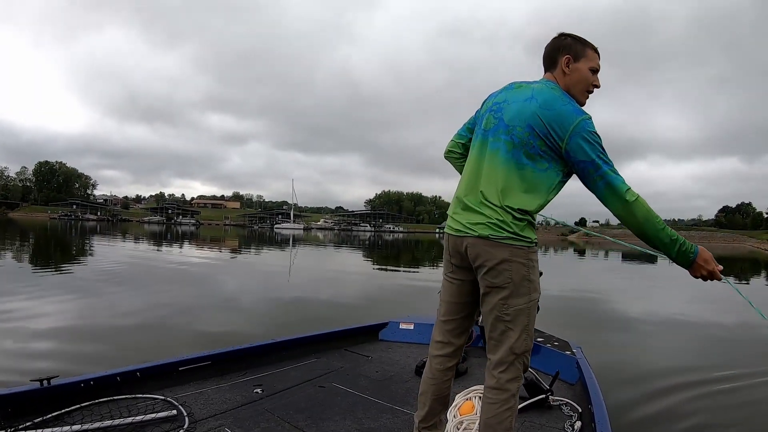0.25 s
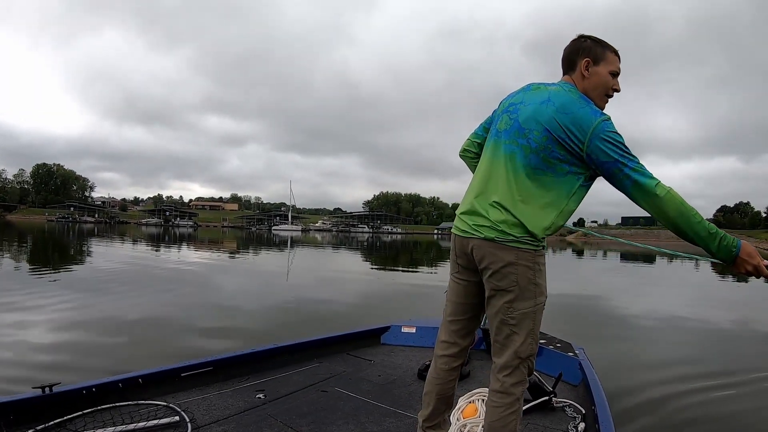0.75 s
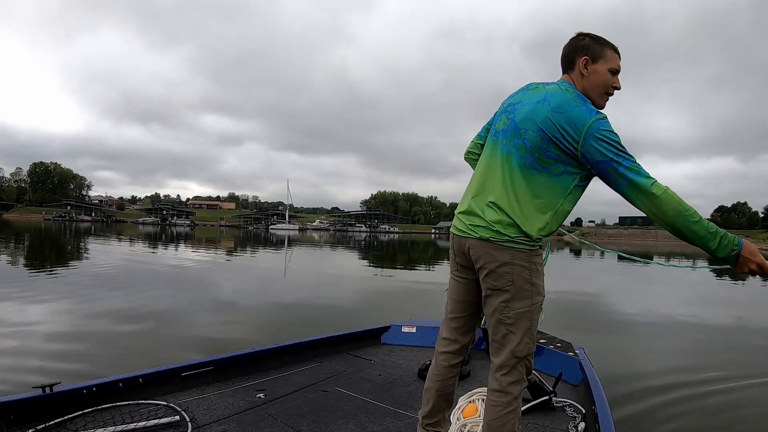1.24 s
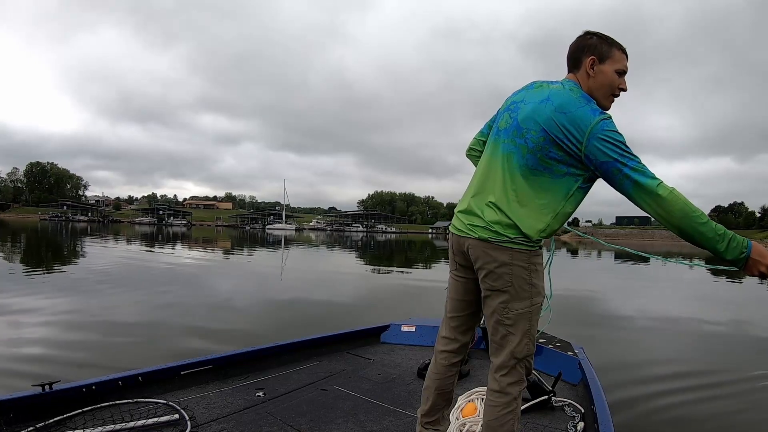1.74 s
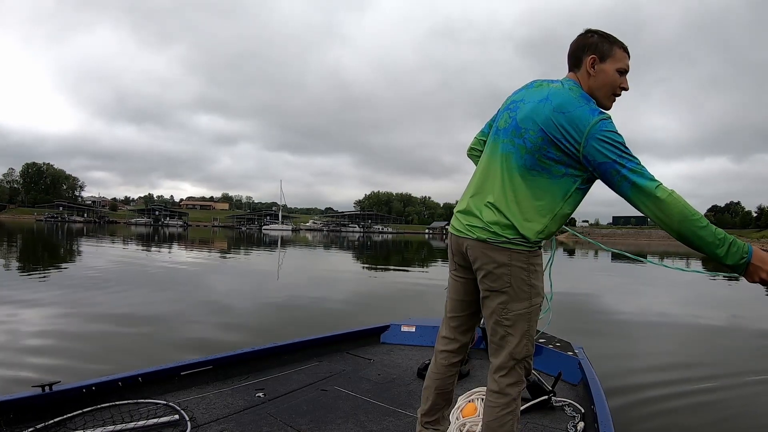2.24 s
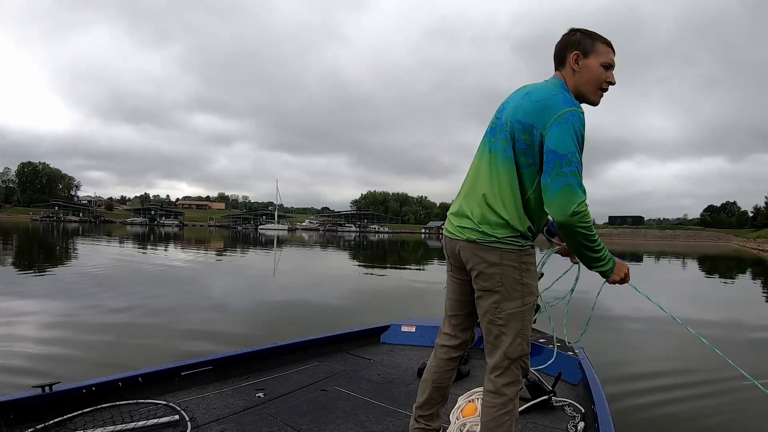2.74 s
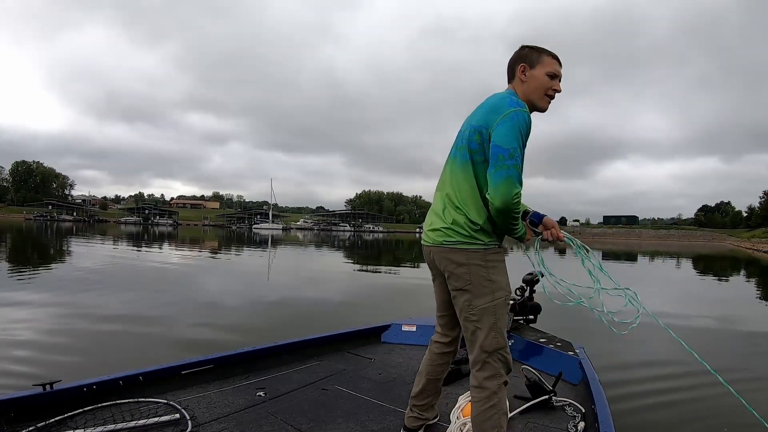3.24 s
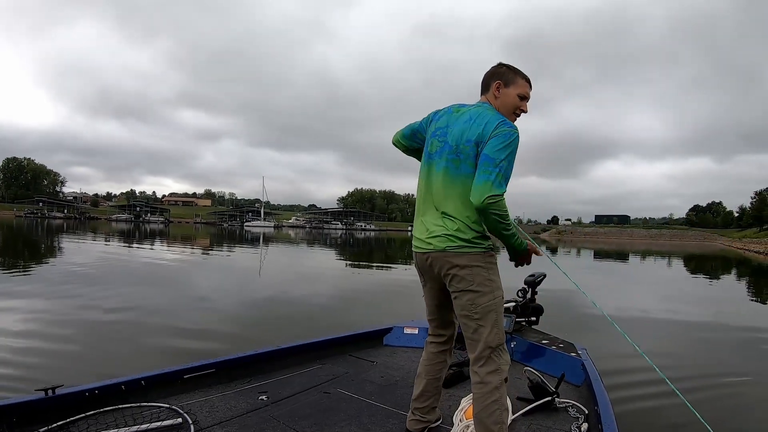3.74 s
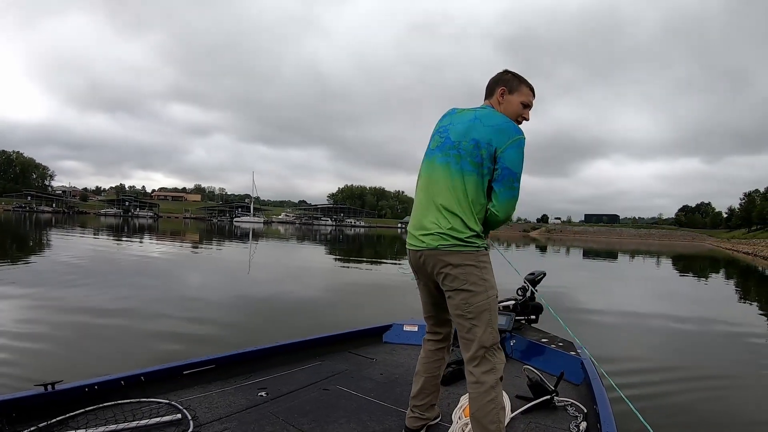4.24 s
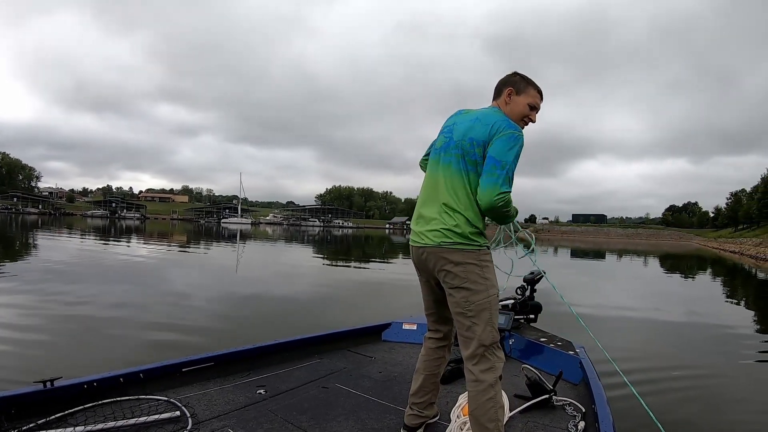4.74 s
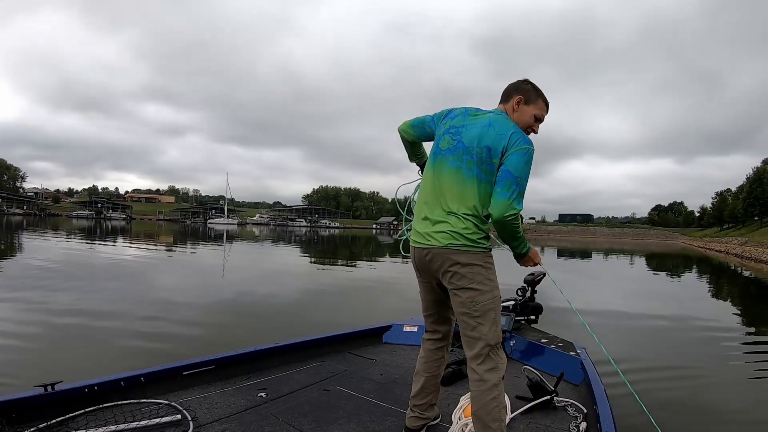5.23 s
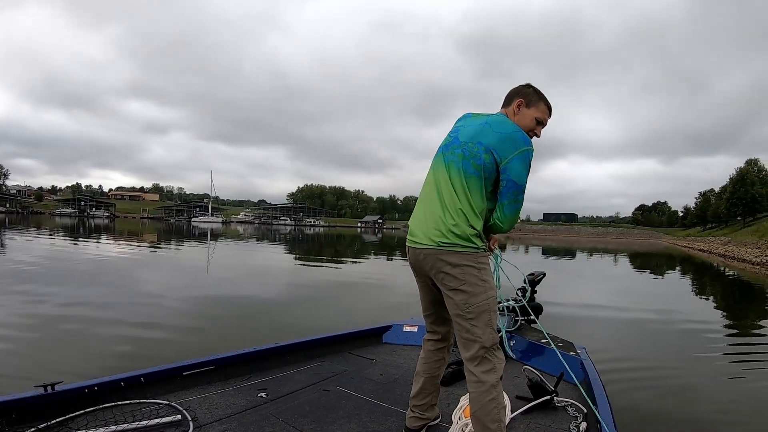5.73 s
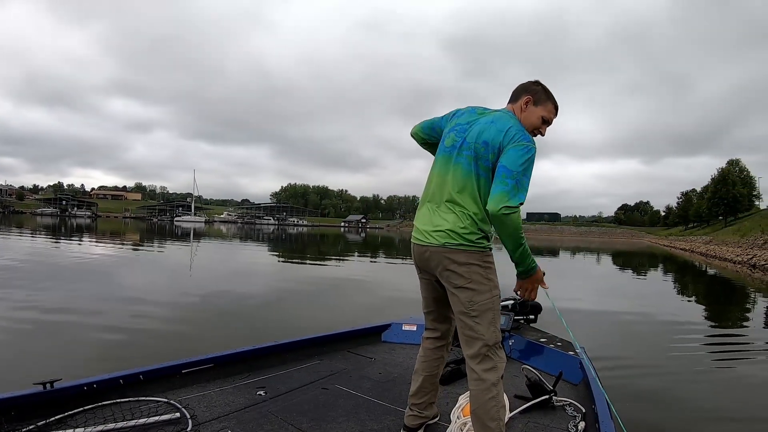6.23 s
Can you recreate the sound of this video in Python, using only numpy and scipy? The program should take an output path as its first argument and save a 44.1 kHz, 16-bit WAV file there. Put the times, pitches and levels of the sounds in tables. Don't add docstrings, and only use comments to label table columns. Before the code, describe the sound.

Quiet outdoor water with low far-off motor hum and soft wind thumps; a brief bubbly splash, then sparse bright drips and one sharp tick.

```python
import sys
import numpy as np
from scipy import signal
from scipy.fft import rfft, irfft, next_fast_len
from scipy.io import wavfile
from scipy.ndimage import uniform_filter1d, map_coordinates

SR = 44100
rng = np.random.default_rng(int(sys.argv[2]) if len(sys.argv) > 2 else 0)


def rack_gain(trim_db):
    fader = np.asarray(trim_db, float)
    return 10 ** (fader / 20)


def wav_record(signal):
    frames = np.transpose(np.atleast_2d(signal))
    bounded = np.clip(frames, -1, 1)
    quanta = np.round(bounded * 32767).astype(np.int16)
    wavfile.write(sys.argv[1], SR, quanta)


N = 285756

# (frequency [Hz], density [dB per Hz])
BREEZE_SPECTRUM = [(1.2, -9.5), (2.5, -1.5), (6, 2.5), (10, -1.5), (20, -19), (40, -47), (80, -82.5)]
# (time [s], peak level [dB], length [s])
GUSTS = [(.34, -40, 0.18), (1.238, -29, .12), (1.53, -21, .1), (1.691, -11.5, .07), (1.902, -19.5, 0.098),
         (2.182, -19, 0.15), (2.373, -23.5, 0.073), (2.67, -12.5, .2), (3.373, -27, .25), (3.8, -22, 0.34),
         (4.14, -21, 0.17), (4.404, -22.5, .14), (4.722, -30, 0.11), (4.95, -33, .35), (5.43, -23, 0.14),
         (5.744, -20.5, 0.18), (5.94, -24.5, 0.11), (6.1, -29.5, 0.16), (6.392, -30, 0.13)]
# (time [s], level [dB])
TRAFFIC = [
    (0, -56),
    (.7, -57),
    (1.2, -59),
    (2.2, -55.5),
    (2.65, -56.5),
    (4, -54.7),
    (4.6, -56),
    (5.05, -54.5),
    (6.48, -55.5),
]
# (frequency [Hz], density [dB per Hz])
RUMBLE_SPECTRUM = [(15, -13), (28, -4.5), (40, -13), (64, -6), (107, -12), (148, -14.5), (210, -20),
                   (307, -23), (570, -29), (900, -55)]
# (frequency [Hz], density [dB per Hz])
HISS_SPECTRUM = [(300, -13), (570, -2.5), (1150, -2), (1720, -5), (3000, -11.5), (5000, -18), (8000, -25),
                 (12000, -32), (15700, -42)]
# (frequency [Hz], width [Hz], level [dB])
TYRE_RESONANCES = [(800, 454, 0), (767, 130, -9)]
# (frequency [Hz], width [Hz], level [dB])
BLURRED_MOTORS = [(58.7, 17, -49), (86.5, 8.2, -53), (116.3, 5.8, -52.5), (142.1, 6.4, -52)]
# (frequency [Hz], level [dB])
STOPPING_MOTOR = [(161, -56), (186, -52), (215.3, -51), (425.3, -61)]
# (first [Hz], middle [Hz], last [Hz], first level [dB], last level [dB])
DRONES = [(57, 59, 56, -45.5, -43.5), (86, 88, 82, -51, -49.5), (242.6, 242.9, 241.2, -60, -58)]
# (time [s], length [s], first
# [Hz], last [Hz], peak level [dB])
WHINE_SWELLS = [
    (1.07, 0.27, 634, 628, -56.5),
    (3.17, 0.37, 800, 790, -54),
    (3.5, .42, 816, 800, -56),
    (3.8, 0.81, 794, 759, -60),
]
# (start [s], end [s], peak level [dB], mean pitch [Hz])
SPRAY = [(2.729, 2.791, -35, 2410), (2.761, 2.812, -36.5, 4400), (2.86, 2.898, -51, 3460),
         (2.88, 2.935, -46, 8500), (3.037, 3.11, -56, 8000), (4.045, 4.08, -52, 7000),
         (4.357, 4.393, -49, 3450), (4.406, 4.445, -53, 3200), (4.461, 4.572, -51.5, 2800),
         (4.719, 4.84, -64, 8800), (5.786, 5.922, -54, 5500), (6.119, 6.3, -52, 3300),
         (6.108, 6.12, -54, 8200), (2.77, 2.825, -43, 9000), (2.732, 2.77, -50, 7500), (0, .22, -53, 3300)]
# (time [s], peak level [dB], pitch [Hz])
DRIPS = [(0.3436, -50, 8950), (0.4536, -43, 4300), (0.5865, -45, 6330), (1.3651, -50, 10640),
         (2.9165, -38, 10400), (2.963, -50, 5700), (3.0163, -42, 9130), (3.0485, -46, 4440),
         (3.082, -51, 8100), (3.2715, -44, 7920), (3.3084, -45, 9350), (3.3802, -48, 9220),
         (3.3998, -51, 6550), (3.4126, -44, 8050), (3.4256, -38, 9600), (3.4527, -44, 5810),
         (3.6206, -46, 5000), (3.7542, -49, 5850), (4.0457, -46, 6980), (4.0559, -50, 7450),
         (4.243, -47, 9400), (4.3835, -47, 7410), (4.601, -36, 2400), (4.6049, -24.5, 8900),
         (4.9039, -49, 9170), (4.9587, -47, 7670), (5.5432, -41, 11000), (5.7937, -45, 3598),
         (5.82, -50, 8500), (5.871, -48, 4500)]
# (time [s], peak level [dB], pitch [Hz])
FAT_DROPS = [
    (3.0077, -41.5, 4310),
    (3.2546, -45, 5800),
    (4.1273, -39, 4900),
    (4.3605, -50, 4000),
    (4.378, -40, 2500),
    (4.412, -44, 3000),
    (4.4289, -37.5, 2180),
    (5.348, -44, 3300),
]
# (time [s], peak level [dB],
# pitch [Hz], life [cycles])
RINGING_BUBBLES = [(2.7415, -36, 4090, 2.9), (2.7421, -28.5, 1230, 8.7), (2.7499, -29, 2770, 3.3),
                   (2.7509, -32.5, 7700, 4.7), (2.7529, -28, 1260, 5.6), (2.7543, -27, 1700, 1.4),
                   (2.7577, -29, 2235, 9.7), (2.7591, -28.5, 4000, 5.8), (2.7749, -25.5, 4250, 3.9),
                   (2.7758, -33, 1465, 6.6), (2.777, -27, 7500, 1.9), (2.7775, -30, 2410, 6),
                   (2.7797, -25, 3400, 1.1), (2.7886, -37, 8700, 6.6), (2.7888, -35, 4260, 5),
                   (2.7892, -35, 2450, 4), (2.7977, -35, 7900, 3.3), (2.8037, -31, 3940, 7.2),
                   (2.8038, -30, 9220, 2.6), (2.812, -36, 4560, 6.2), (2.8135, -31, 7800, 2.6),
                   (2.8639, -41, 2200, 12.7), (2.8716, -36, 3750, 2.1), (2.8763, -28.5, 2740, 3.4),
                   (2.8818, -38, 5770, 2.2), (2.8834, -37, 2280, 3.1), (2.8892, -31, 3970, 5.0),
                   (2.9023, -37, 7620, 2.1), (2.9147, -36, 7500, 4.3), (2.932, -43, 9000, 5.4),
                   (2.7565, -32.5, 1220, 8.7), (2.7605, -38, 2230, 8.4), (2.7665, -40, 4200, 16),
                     (2.7497, -30, 5800, 1.8), (2.7768, -43, 12000, 2), (2.8038, -43, 13000, 2),
                     (4.6049, -30, 13000, 1.5), (4.601, -42, 1600, 1.4), (4.6049, -33, 9400, 1),
                     (2.7425, -41, 770, 3), (5, -44, 2700, 1.5), (4.4292, -43, 3600, 1.3),
                     (0.4536, -46, 2780, 12), (4.6049, -40.5, 4460, 7)]
# (time [s], length [s], first [Hz], last [Hz], peak level [dB])
WHISTLES = [(.66, 0.1, 4550, 4820, -64), (.74, .15, 4780, 4960, -72), (.87, 0.065, 4850, 4250, -62.5),
            (1.02, .16, 4700, 4360, -63), (1.24, .075, 4090, 4220, -65), (.72, .05, 5700, 5850, -74),
            (1.61, .04, 4380, 4380, -68), (2.62, 0.11, 3820, 3870, -62), (2.67, .045, 4180, 4400, -64),
            (3.255, .035, 4330, 4310, -64), (4.04, .055, 2700, 2800, -60), (4.12, .12, 2820, 2800, -65),
            (4.08, 0.067, 4180, 4200, -69), (5.27, .08, 4150, 4150, -67), (5.43, 0.13, 4650, 4590, -70),
            (5.6, 0.073, 2750, 2700, -64.5), (6.07, .055, 4380, 4380, -66), (6.13, .06, 4950, 4300, -70),
            (.46, 0.044, 2500, 2250, -64), (2.21, .04, 3900, 4100, -67), (2.47, .09, 3050, 3200, -68),
            (5.49, .06, 3010, 3050, -69), (6.33, .08, 3520, 3500, -67), (.8, .03, 3450, 3950, -64)]
# (delay [s], level [dB])
HULL_ECHOES = [(.0011, -21), (.0026, -13)]
# (decay time to -60 dB [s], level [dB])
HULL_SCATTER = (0.031, -13)


def unit(x):
    return x / np.sqrt(np.mean(x ** 2) + 1e-20)


def curves(rows):
    s, *cols = np.transpose(rows)
    t = np.arange(N) / SR
    return [np.interp(t, s, c, left=c[0], right=c[-1]) for c in cols]


def wobble(rate):
    knots = rng.standard_normal(int(N * rate / SR) + 4)
    return map_coordinates(knots, [np.arange(N) * rate / SR])


def shaped(x, response):
    m = next_fast_len(N + 8192)
    spectrum = rfft(x, m) * response(np.fft.rfftfreq(m, 1 / SR))
    return unit(irfft(spectrum, m)[:N])


def colour(points):
    f, db = np.transpose(points)
    return lambda hz: rack_gain(np.interp(np.log(hz + 0.17), np.log(f), db, left=-120))


def hump(centre_hz, width_hz):
    return lambda hz: 1 / (1 + (2 * (hz - centre_hz) / width_hz) ** 2)


def patchy(depth_db):
    z = signal.stft(rng.standard_normal(N + 1024), nperseg=512)[2]
    field = uniform_filter1d(rng.standard_normal(z.shape), 6, 0)
    field = uniform_filter1d(field, 14, 1)
    return signal.istft(z * rack_gain(depth_db * unit(field)), nperseg=512)[1][:N]


def far_tones(tables, flutter_db, waver, rate):
    total, t = np.zeros(N), np.arange(N) / SR
    flutter = rack_gain(4 + flutter_db * wobble(rate))
    bend = 1 + waver * wobble(rate)
    for rows in tables:
        hz, db = curves(rows)
        on = (t > rows[0][0]) & (t < rows[-1][0])
        phase = 2 * np.pi * np.cumsum(hz * bend) / SR
        total += on * rack_gain(db) * np.sin(phase)
    return total * flutter


def swells(rows, edge_db):
    bow = 1.008
    return [[(s, first, db + edge_db), (s + span / 2, bow * (first + last) / 2, db), (s + span, last, db + edge_db)]
            for s, span, first, last, db in rows]


def bubbles(rows, rise, crack):
    s, db, hz, cycles = (c[:, None] for c in np.transpose(rows))
    t = np.arange(1500) / SR
    age = t * hz / cycles * 1.7
    envelope = 2.33 * (1 - np.exp(-3.5 * age)) * np.exp(-age)
    phase = 2 * np.pi * hz * t * (1 + rise * (age / 2 - .6))
    tick = crack * np.exp(-t / 0.00015) * rng.standard_normal((len(rows), len(t)))
    rings = rack_gain(db) * (envelope * np.sin(phase) + tick)
    where = np.round(s * SR).astype(int) + np.arange(len(t))
    return np.bincount(where.ravel(), rings.ravel(), N + SR)[:N]


def breeze():
    calm_db, fall_db = -41, 22
    push_ceiling = .24
    t = np.arange(N) / SR
    level = rack_gain(calm_db) + sum(rack_gain(db - fall_db * ((t - s) / span) ** 2) for s, db, span in GUSTS)
    swings = shaped(rng.standard_normal(N), colour(BREEZE_SPECTRUM))
    even = swings / np.sqrt(np.abs(uniform_filter1d(swings ** 2, SR // 5)) + 0.23)
    push = level * unit(even)
    return push_ceiling * np.tanh(push / push_ceiling)


def far_shore():
    traffic_db, = curves(TRAFFIC)
    rumble_db = -39.4 + 0.22 * (traffic_db - traffic_db.mean())
    rumble = rack_gain(rumble_db) * shaped(patchy(0.48), colour(RUMBLE_SPECTRUM))
    roar = sum(rack_gain(db) * shaped(patchy(1.4), hump(hz, w)) for hz, w, db in TYRE_RESONANCES)
    tyres = rack_gain(1.587 * traffic_db + 33.5) * roar
    hiss = rack_gain(-54) * shaped(patchy(0.65), colour(HISS_SPECTRUM))
    return rumble + tyres + hiss


def motors():
    t, end_s = np.arange(N) / SR, N / SR
    blur = sum(rack_gain(db) * shaped(rng.standard_normal(N), hump(hz, w)) for hz, w, db in BLURRED_MOTORS)
    clear = sum(rack_gain(db + 5 + wobble(5.6)) * np.sin(2 * np.pi * hz * t) for hz, db in STOPPING_MOTOR)
    clear = clear * np.clip((0.92 - t) / 0.14, 0, 1)
    drone = np.zeros(N)
    for first, middle, last, first_db, last_db in DRONES:
        path = [(0, first, first_db), (end_s / 2, middle, (first_db + last_db) / 2), (end_s, last, last_db)]
        drone += far_tones([path], flutter_db=1.8, waver=0.012, rate=6)
    whines = far_tones(swells(WHINE_SWELLS, edge_db=-13), flutter_db=0.5, waver=0.02444, rate=18)
    return blur + drone + clear + whines


def spray():
    rows = []
    for start, end, db, hz in SPRAY:
        when, size, pitch, life = rng.random((40, 4)).T
        bell = np.sin(np.pi * when) ** .5
        times = start + (end - start) * when
        levels = db - 14 * size - 12 * (1 - bell)
        pitches = np.minimum(hz * np.exp(1.1 * (pitch - .5)), 13000)
        rows.append(np.transpose([times, levels, pitches, 2 + 6 * life ** 2]))
    return bubbles(np.concatenate(rows), rise=0.14, crack=0.25)


def drips():
    single = [(s, db, hz, 2.8 + 0.62 * np.log2(hz / 4000)) for s, db, hz in DRIPS]
    twin_ratio, twin_db, fat_cycles = 1.78, -2.5, 2.6
    fat = [(s, db + k * twin_db, hz * twin_ratio ** k, fat_cycles) for s, db, hz in FAT_DROPS for k in (0, 1)]
    string_s, gap_s, string_db, string_hz = 4.74, .0115, -52, 8700
    string = [(string_s + gap_s * (k + .3 * a), string_db + 2.5 * b, string_hz * (1 + .06 * c), 5)
              for k, (a, b, c) in enumerate(rng.standard_normal((8, 3)))]
    return bubbles(single + fat + string, rise=0.018, crack=0.25)


def splashes():
    return bubbles(RINGING_BUBBLES, rise=0.013, crack=0.15)


def birds():
    return far_tones(swells(WHISTLES, edge_db=-10.5), flutter_db=2.5, waver=0.0039, rate=76)


def hull(x):
    t60_s, scatter_db = HULL_SCATTER
    t = np.arange(SR // 16) / SR
    tail = rng.standard_normal(len(t)) * rack_gain(-60 * t / t60_s) * (t > .002)
    tail = tail / np.linalg.norm(tail)
    wet = x + rack_gain(scatter_db) * signal.fftconvolve(x, tail)[:N]
    for late, db in HULL_ECHOES:
        wet += rack_gain(db) * np.roll(x, round(late * SR))
    return signal.sosfilt(signal.butter(1, 11500, fs=SR, output="sos"), wet)


def scene():
    air = breeze() + far_shore() + motors() + birds()
    water = spray() + drips() + splashes()
    return (hull(water) + air)[None]


def band_limit(x):
    return signal.sosfilt(signal.butter(12, 16390, fs=SR, output="sos"), x)


def record(dry):
    passed = np.fft.rfftfreq(N, 1 / SR) < 15790
    banded = irfft(rfft(dry) * passed, N)
    return band_limit(banded)


dry = scene()
out = record(dry)
wav_record(out)
```